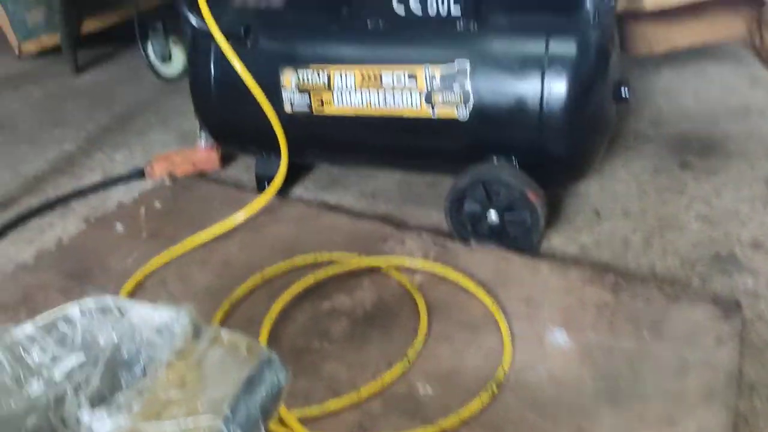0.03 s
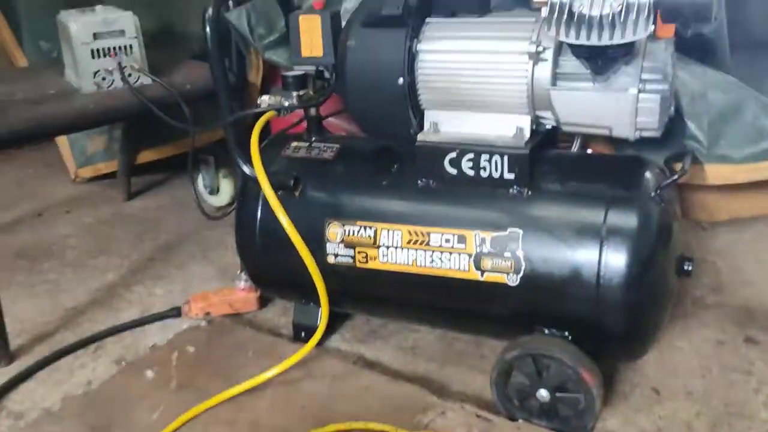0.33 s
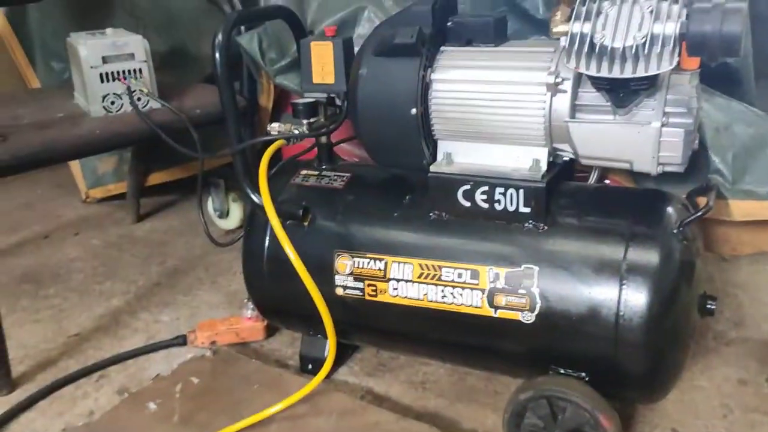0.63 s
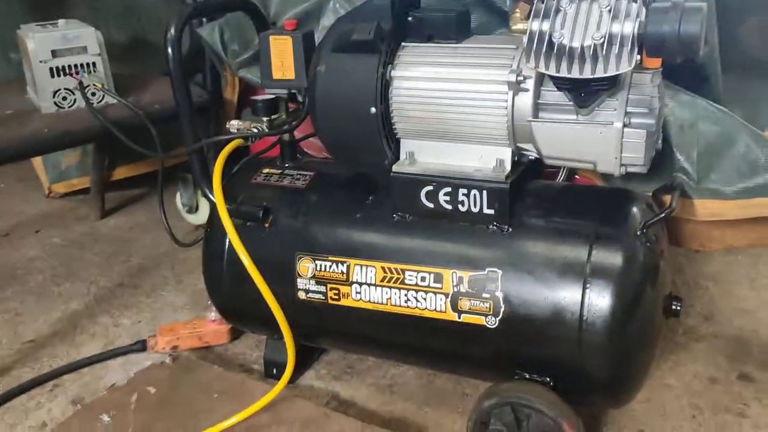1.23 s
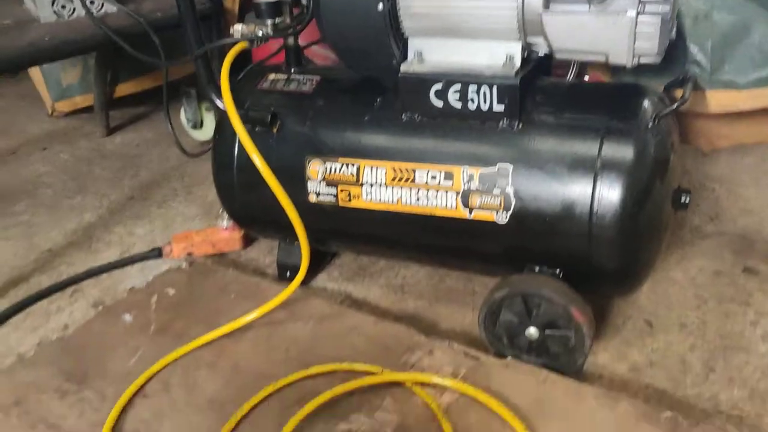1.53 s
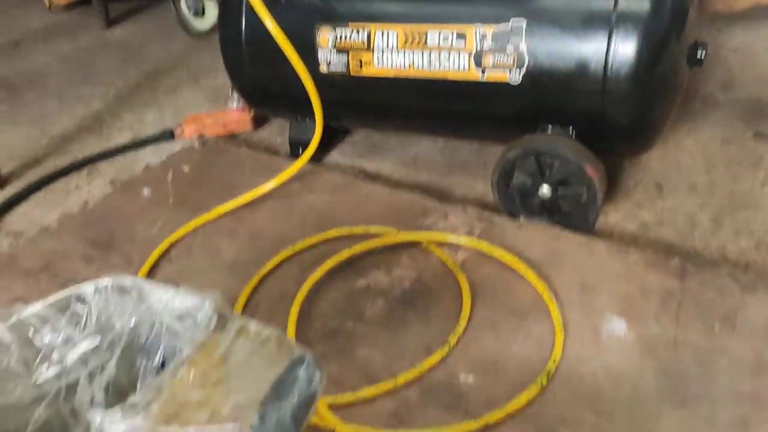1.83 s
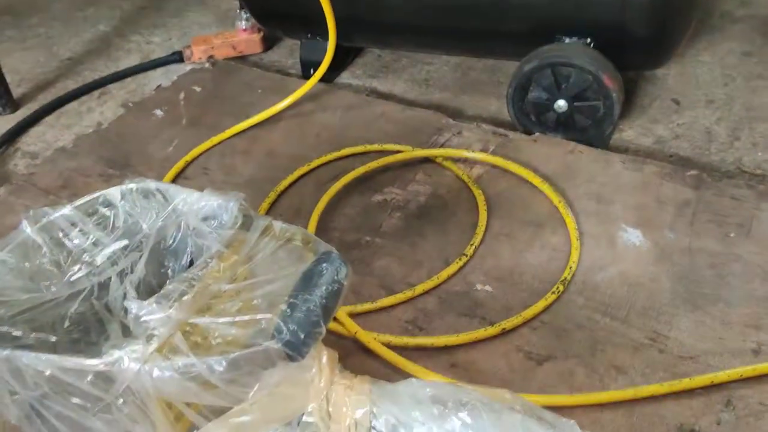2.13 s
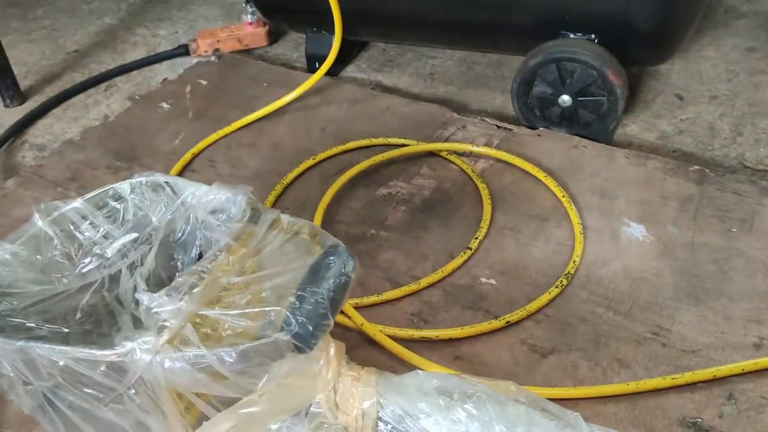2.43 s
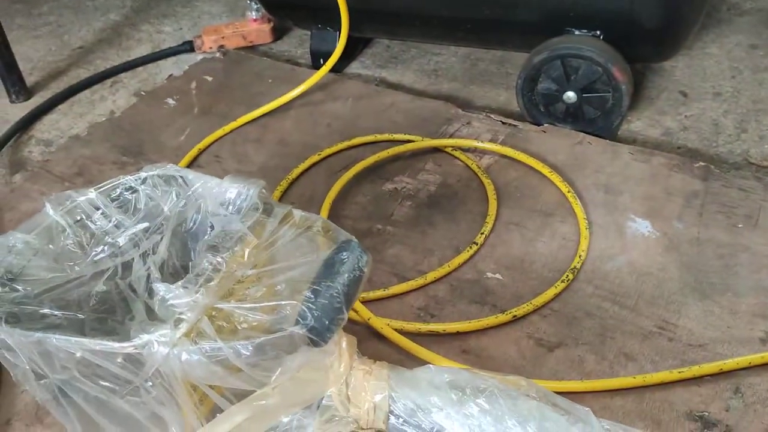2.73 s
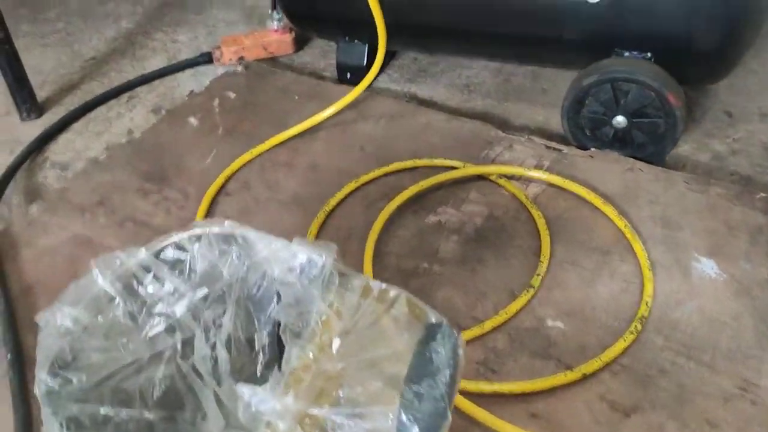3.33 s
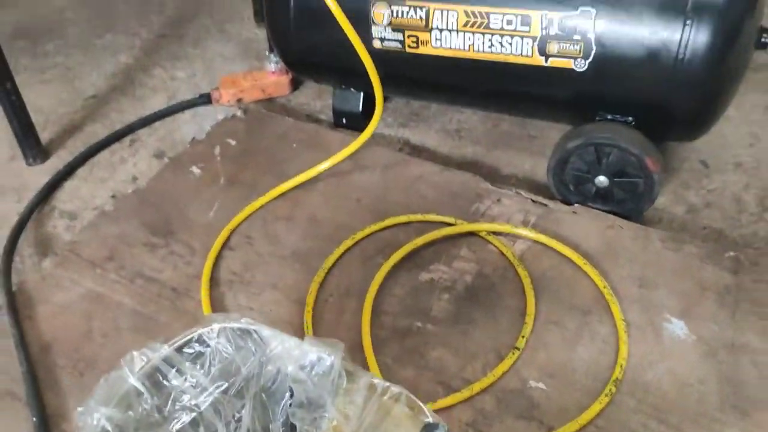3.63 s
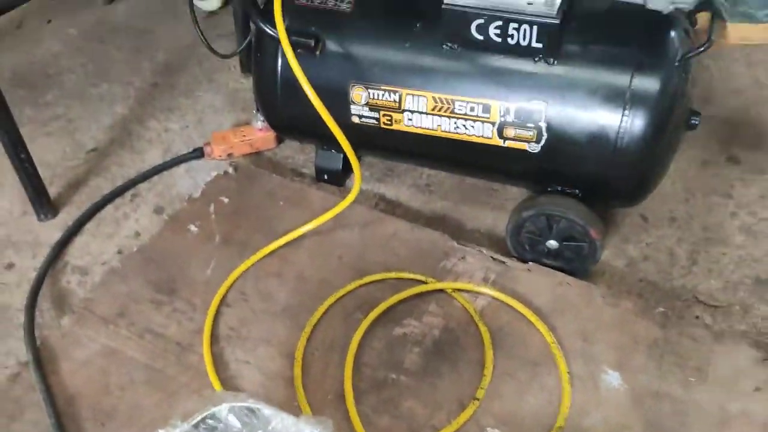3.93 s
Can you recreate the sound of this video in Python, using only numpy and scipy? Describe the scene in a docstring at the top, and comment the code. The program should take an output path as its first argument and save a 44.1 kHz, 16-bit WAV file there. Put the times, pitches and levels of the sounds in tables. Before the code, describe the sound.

Compressed air hisses loudly from a nearby spray gun in a workshop, its tone shifting slightly. The hiss cuts off with a brief echo, leaving the quieter thrum and fan whoosh of a piston compressor.

```python
"""A loud hiss of air blasts from a spray gun in a workshop, then stops and dies away in the room.
The hiss is rushing compressed air, cut off when the trigger is let go. Behind it a piston compressor
thrums all the while: its pump hums, its valve puffs once a turn and rings the metal, its fan whooshes.
A phone's gain control holds everything down during the blast and lets the compressor swell just after."""
import sys
import numpy as np
from scipy import signal
from scipy.fft import rfft, irfft
from scipy.io import wavfile
from scipy.ndimage import uniform_filter1d, minimum_filter1d, map_coordinates

SR = 44100
rng = np.random.default_rng(int(sys.argv[2]) if len(sys.argv) > 2 else 0)


def inscribe(sig):
    """Save sig as 16-bit PCM at rate SR to the path in sys.argv[1].

    A 1-D sig is mono; a 2-D sig holds one channel per row.
    Samples are clipped to [-1, 1] before scaling.
    """
    pcm = np.round(np.clip(np.atleast_2d(sig).T, -1, 1) * 32767)
    wavfile.write(sys.argv[1], SR, pcm.astype(np.int16))


N = 176400

# Speed of the compressor's shaft: time_s, turns_per_s
SHAFT_SPEED = [(0, 34.7), (1.2, 34.66), (1.6, 34.5), (2.4, 34.5), (2.9, 34.68), (3.25, 34.82),
               (3.55, 34.68), (4, 34.62)]
# Tone colour of the cooling fan and motor: pitch_hz, level_db
FAN_COLOUR = [(25, -35), (110, -7), (300, -3), (600, 9), (1200, 0.5), (1900, 0.5), (2800, 0.5), (3700, 4),
              (5200, 0.5), (7600, -1.5), (8400, -10.5), (9800, -10.5), (15500, -27.5)]
# How alike the machine sounds left and right: pitch_hz, likeness (1 = the same)
MACHINE_LIKENESS = [(100, 0.98), (650, 0.9), (1100, 0.46), (1500, 0.35), (3500, -0.24), (8000, 0.25)]
# Narrow notches the phone leaves in the treble of the whoosh and puffs: pitch_hz, width_hz, depth_db
TREBLE_NOTCHES = [(4020, 90, 5), (6560, 110, 5), (7260, 150, 12), (8080, 200, 22), (9350, 140, 8),
                  (12350, 250, 10)]
# Loudness of the valve's puffs at the moving phone: time_s, level_db
PUFF_LEVEL = [(0, -34), (3, -34.5), (3.33, -31), (4, -32.5)]
# Pitches at which the cylinder head rings: pitch_hz, width_hz, level_db
HEAD_RINGS = [(2140, 240, -4), (3680, 190, 3.5), (4560, 130, 1), (6060, 170, 0), (6930, 170, 2),
              (7650, 150, 1.5), (9000, 140, -4), (9800, 220, -10), (10700, 180, -16)]
# Tones of the pump and tank: cycles_per_turn, level_db
PUMP_TONES = [(2, -32), (3, -27), (4, -22), (5, -14), (6, -19), (7, -18), (8, -7), (9, -5), (10, -23),
              (11, -13), (12, -18), (13, -10), (14, -10), (15, -12), (16, 0), (17, -7), (18, -4), (19, 0),
              (20, -4), (21, -14), (22, -9), (23, -2), (24, -11), (25, -14), (26, -9), (27, -7), (28, -16),
              (29, -14), (30, -19), (31, -15), (32, -13), (33, -8), (34, -3), (35, -17), (36, -15),
              (37, -21), (38, -20), (39, -22), (40, -20), (41, -19), (42, -20), (43, -16), (44, -13),
              (45, -20), (46, -21), (47, -9), (48, -14)]
# Loudness of the pump's hum by band, with a quick swell as the gain control lets go:
# time_s, then change_db for each of PUMP_BANDS_HZ
HUM_LOUDNESS = [(0, -.5, 3, 1, 0, 0), (1.4, -4.2, -3, -6, -2, -1), (2.71, -4, 0, -4, -2, -.5),
                (2.735, 0, 2.5, -5, .5, .5), (3.05, -.5, 1.5, -6, -.5, 0), (3.3, 0, 1, -1, -.8, -1.5),
                (3.55, 0, -1, 0, 1, 3.5), (3.8, -.5, -2, 2, 1.5, 3), (4, -1.5, -4.5, 3, 0, 2)]
# One soft piston thump and three harder knocks in each turn: place_turns, strength_db, top_hz
PISTON_KNOCKS = [(.11, 0, 2000), (.38, -1, 2000), (.64, 7, 420), (.85, -2.5, 2000)]
# The room's share of the hiss, less as the gun nears the phone: time_s, level_db
ROOM_SHARE = [(0, -2.5), (.9, -3), (1.3, -14), (2, -6.5), (2.6, -5.5)]
# Echoes of the jet off nearby surfaces: delay_s, level_db
NEAR_ECHOES = [(.0007, -19), (.0021, -17), (.0046, -11)]
# Tone colour of the air jet: pitch_hz, level_db
JET_COLOUR = [(40, -51), (120, -36.5), (280, -25.5), (400, -21), (540, -8), (850, -11), (1150, -3.5),
              (1400, -6.5), (2000, -2), (2800, -2), (3800, -4), (4600, -6.5), (6000, -8.5), (7300, -15),
              (8100, -23.5), (10000, -23.5), (12500, -28.5), (15500, -37)]
# Rings of the gun's air cap and passages, and a hollow between them: pitch_hz, width_hz, lift_db
GUN_RINGS = [(1610, 90, 3.5), (2030, 130, 4), (2350, 130, 3.8), (2680, 130, -1.5), (3150, 130, 2.2),
             (3680, 200, 2.2)]
# How alike the jet sounds left and right: pitch_hz, likeness (1 = the same)
JET_LIKENESS = [(250, 0.66), (700, 1), (1200, 0.52), (3000, 0.45), (6000, 0.12), (12000, 0.083)]
# The jet's lean to the left: pitch_hz, left_minus_right_db
JET_LEAN = [(400, 11), (1000, 2), (2200, -0.7), (5000, 0.8), (8500, 3), (14000, 0.5)]
# Changing colour as the gun is moved about: time_s, then change_db for each of JET_BANDS_HZ
JET_AIM = [(0, 2.5, 2.5, 4, 6), (.1, 2, 2, 5, 6), (.2, -.5, 0, 0, .8), (.36, 0, 2.8, .6, .6),
           (.5, 2, 5, .9, 1.8), (.76, .8, 4.8, -.2, .9), (.95, -.3, .8, -.3, 0), (1.15, -.8, .3, 0, -.2),
           (1.24, -4.3, -2.6, -3.6, -4), (1.36, -2, -1.2, -1.3, -1.8), (1.58, 0, 1.2, 0, -.3),
           (1.74, -.5, -.5, -.7, -.3), (1.9, 1.5, .6, 1, 1), (2.06, 1.7, 1.5, 3, 3.4),
           (2.14, -.3, -1.3, .7, 1.7), (2.25, 1.7, 1.2, 2.6, 2.9), (2.62, .3, -.3, 1, .5)]

PUMP_BANDS_HZ, JET_BANDS_HZ = (310, 555, 660, 900, 1630), (1050, 2200, 3500, 5800)
START_TURNS_PER_S = SHAFT_SPEED[0][1]
PITCHES_HZ = np.arange(N // 2 + 1) * SR / N  # every pitch a filter can turn up or down


def gain(db):
    """Turn decibels into a number to multiply by."""
    return 10 ** (np.asarray(db) / 20)


def set_level(sound, db):
    """Scale a sound to an average (rms) level."""
    return sound * gain(db) / np.sqrt(np.mean(sound ** 2))


def over_time(table, column=1):
    """Read a column of a timed table at every sample."""
    rows = np.array(table, float)
    return np.interp(np.arange(N) / SR, rows[:, 0], rows[:, column])


def at_pitch(table, hz):
    """Read a table at a pitch, with octaves evenly spaced."""
    rows = np.array(table, float)
    return np.interp(np.log(hz + 1), np.log(rows[:, 0]), rows[:, 1])


def band_share(centres_hz, band, hz):
    """How much of a pitch belongs to the given band."""
    return at_pitch([(centre, float(k == band)) for k, centre in enumerate(centres_hz)], hz)


def bumps(table):
    """Bell-shaped bumps in decibels across all pitches."""
    return sum(db * np.exp(-((PITCHES_HZ - hz) / width) ** 2) for hz, width, db in table)


def filtered(sound, gains):
    """Give each pitch in a sound its own gain."""
    return irfft(rfft(sound) * gains, N)


def drift(rate_hz):
    """A smooth random wobble of typical size 1."""
    slow_only = np.exp(-(PITCHES_HZ / rate_hz) ** 2) * (PITCHES_HZ > 0)
    return set_level(filtered(rng.standard_normal(N), slow_only), 0)


def rushing_air(colour, likeness):
    """Stereo noise: one part both sides share, one part that sets them apart."""
    alike = np.clip(at_pitch(likeness, PITCHES_HZ), -.99, .99)
    gains = gain(at_pitch(colour, PITCHES_HZ)) * np.sqrt([1 + alike, 1 - alike])
    shared, apart = filtered(rng.standard_normal((2, N)), gains)
    return set_level(np.array([shared + apart, shared - apart]), 0)


def cooling_fan():
    """The fan and motor make a steady whoosh."""
    return gain(-26.5) * rushing_air(FAN_COLOUR, MACHINE_LIKENESS)


def valve(turns, opens_at_turns=.01, rise_s=.0028, fall_s=.005, scatter_db=.7):
    """One puff of air a turn, never quite equally strong, rings the cylinder head."""
    puff_count = turns - opens_at_turns + 1
    age_s = (puff_count % 1) / START_TURNS_PER_S
    strength = gain(scatter_db * rng.standard_normal(256))[puff_count.astype(int)]
    swell = (1 - np.exp(-(age_s / rise_s) ** 2)) * np.exp(-age_s / fall_s)
    puffs = strength * swell * rng.standard_normal((2, N))
    head = sum(gain(db) / (1 + 1j * (PITCHES_HZ - hz) / width) ** 2 for hz, width, db in HEAD_RINGS)
    return set_level(filtered(puffs, head), 0) * gain(over_time(PUFF_LEVEL))


def pump(turns, ring_hz=640, sharpness=2.2, waver_db=1.2):
    """Piston knocks ring the pump and tank: a hum made of many gently wavering tones."""
    places, strengths_db, tops_hz = np.array(PISTON_KNOCKS).T
    bands_db = [over_time(HUM_LOUDNESS, k + 1) for k in range(len(PUMP_BANDS_HZ))]
    hum = 0
    for cycles, db in PUMP_TONES:
        hz = cycles * START_TURNS_PER_S
        # The knocks and the ring set where in its cycle each tone starts.
        ring = 1 / (1 + 1j * sharpness * (hz / ring_hz - ring_hz / hz))
        knocks = gain(strengths_db) / (1 + (hz / tops_hz) ** 4)
        start = np.angle(ring ** 2 * np.sum(knocks * np.exp(-2j * np.pi * cycles * places)))
        blur = (.5 + .0008 * hz) * rng.standard_normal()  # high tones line up less neatly
        angle = 2 * np.pi * cycles * turns + start + blur
        spread = np.arccos(at_pitch(MACHINE_LIKENESS, hz)) * rng.choice([-1, 1]) / 2
        tone = np.cos([angle + spread, angle - spread])  # left, right
        change_db = sum(band * band_share(PUMP_BANDS_HZ, k, hz) for k, band in enumerate(bands_db))
        hum = hum + gain(db + change_db + waver_db * drift(rate_hz=1.2)) * tone
    return set_level(hum, db=-22.5)


def compressor(speed_wobble=.0012, waver_db=.48):
    """Pump and valve follow one slightly unsteady shaft while the fan blows."""
    turns_per_s = over_time(SHAFT_SPEED) * (1 + speed_wobble * drift(rate_hz=15))
    turns = np.cumsum(turns_per_s) / SR
    air = (valve(turns) + cooling_fan()) * gain(waver_db * drift(rate_hz=5.9))
    return pump(turns) + filtered(air, gain(-bumps(TREBLE_NOTCHES)))


def workshop_echo(sound, build_s=.0031, low_fade_s=.49, treble_fade_s=.36, split_hz=5000):
    """The room rings on, dropping 60 dB in each fade time; its treble dies sooner."""
    t = np.arange(SR) / SR
    noise = rng.standard_normal((2, SR))
    low = signal.sosfiltfilt(signal.butter(2, split_hz, fs=SR, output="sos"), noise)
    parts = (low, low_fade_s), (noise - low, treble_fade_s)
    tail = sum(part * gain(-60 * t / fade_s) / np.sqrt(fade_s) for part, fade_s in parts)
    tail *= 1 - np.exp(-t / build_s)
    tail /= np.sqrt(np.sum(tail ** 2, axis=1, keepdims=True))
    with_lead_in = np.hstack([sound[:, SR:0:-1], sound])  # the room starts out full of sound
    return signal.fftconvolve(with_lead_in, tail, axes=1)[:, SR:SR + N]


def add_near_echoes(sound, delay_wobble=.0654):
    """Echoes off nearby surfaces shift as the hands move, giving a hollow, changing colour."""
    mix = sound
    for delay_s, db in NEAR_ECHOES:
        read_at = np.arange(N) - delay_s * SR * (1 + delay_wobble * drift(rate_hz=.94))
        echo = np.array([map_coordinates(side, [read_at], order=3, mode="mirror") for side in sound])
        mix = mix + gain(db) * echo
    return set_level(mix, 0)


def spray_gun(stop_s=2.642, shut_s=.009, base_db=-4.5, flutter_db=.55, sputter_db=.8, flicker_db=.65):
    """Swirling air hisses, flutters and changes colour with the aim, until the trigger is let go."""
    hiss = filtered(rushing_air(JET_COLOUR, JET_LIKENESS), gain(bumps(GUN_RINGS)))
    hiss = add_near_echoes(hiss)
    jet = 0
    for k in range(len(JET_BANDS_HZ)):
        band = filtered(hiss, band_share(JET_BANDS_HZ, k, PITCHES_HZ))
        jet = jet + band * gain(over_time(JET_AIM, k + 1) + flicker_db * drift(rate_hz=18))
    flow = np.exp(-np.maximum(np.arange(N) / SR - stop_s, 0) / shut_s)
    jet *= flow * gain(base_db + flutter_db * drift(rate_hz=14) + sputter_db * drift(rate_hz=350))
    in_room = jet + gain(over_time(ROOM_SHARE)) * workshop_echo(jet)
    lean_db = at_pitch(JET_LEAN, PITCHES_HZ) / 2
    delays_s = [.00019, 0]  # the hiss reaches the right microphone first
    arrival = np.exp(-2j * np.pi * np.outer(delays_s, PITCHES_HZ))
    return filtered(in_room, gain([lean_db, -lean_db]) * arrival)


def scene():
    """The air blast over the running compressor."""
    return spray_gun() + compressor()


def record(dry, limit_db=-15, ratio=4.5, sense_s=.018, hold_s=.058, recover_s=.014, top_hz=15700):
    """Gain control turns loud sound down, waits, then lets go quickly; the highest treble is cut."""
    power = uniform_filter1d(np.mean(dry ** 2, axis=0), int(sense_s * SR))
    loudness_db = 10 * np.log10(power + 1e-12)
    change_db = np.minimum(limit_db - loudness_db, 0) * (1 - 1 / ratio)
    half_hold, half_recover = int(hold_s * SR / 2), int(recover_s * SR / 2)
    held_db = minimum_filter1d(change_db, 2 * half_hold + 1, origin=half_hold)
    smooth_db = uniform_filter1d(held_db, 2 * half_recover + 1, origin=half_recover)
    treble_cut = signal.ellip(10, .1, 80, top_hz, fs=SR, output="sos")
    return np.clip(signal.sosfilt(treble_cut, dry * gain(smooth_db)), -1, 1)


dry = scene()
out = record(dry)
inscribe(out)
```